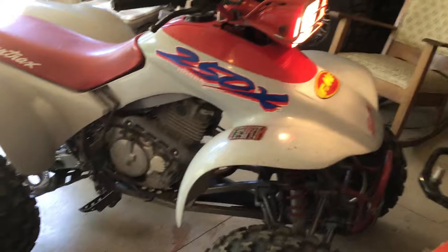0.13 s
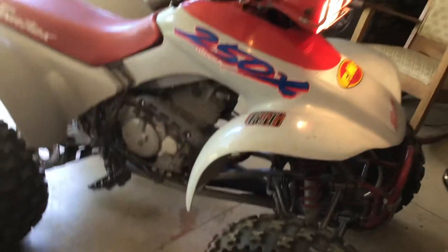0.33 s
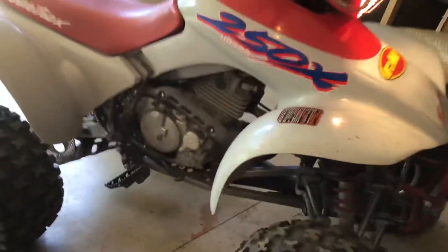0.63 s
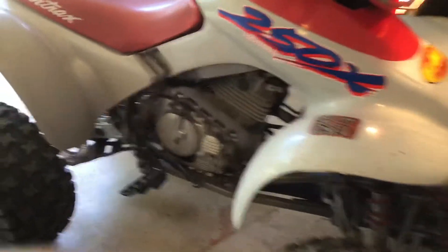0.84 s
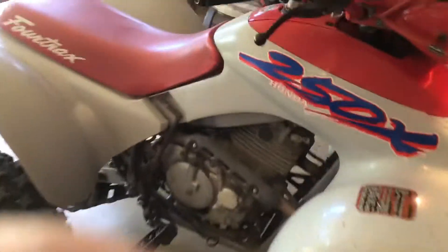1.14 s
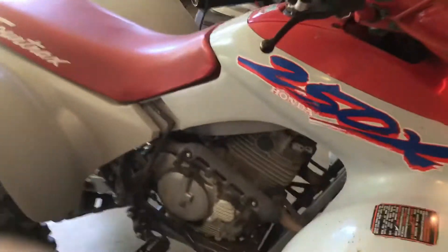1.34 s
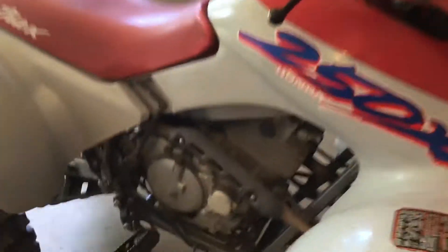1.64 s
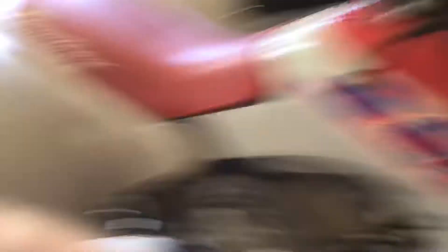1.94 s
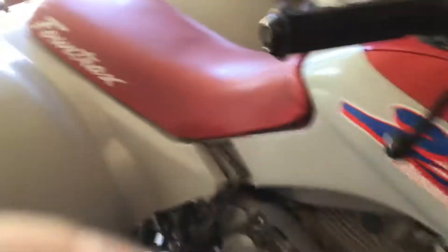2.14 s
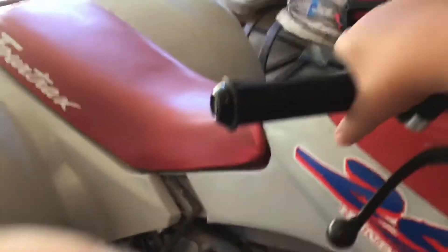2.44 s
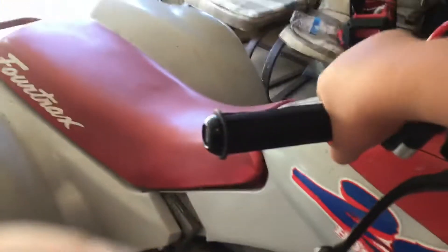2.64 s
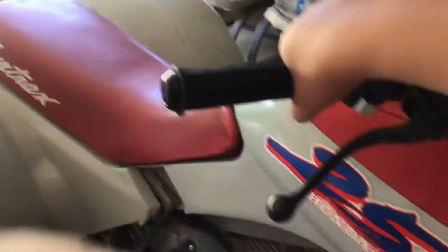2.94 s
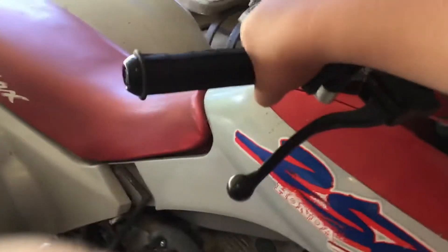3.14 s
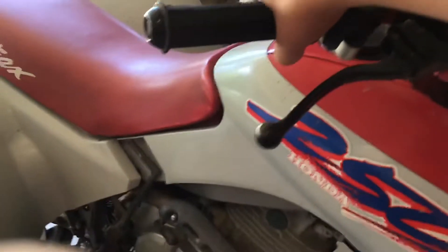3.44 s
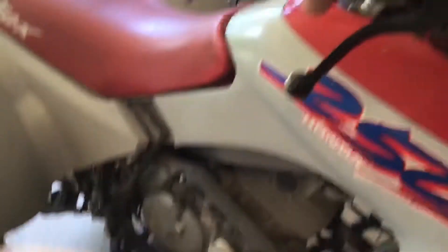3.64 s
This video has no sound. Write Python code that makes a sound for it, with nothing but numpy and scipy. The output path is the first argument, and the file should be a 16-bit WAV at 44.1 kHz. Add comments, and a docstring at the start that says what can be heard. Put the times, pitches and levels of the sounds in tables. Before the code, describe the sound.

A small single-cylinder quad engine idles steadily, chugging and clattering, close to the microphone in a hard-walled garage; near the end the throttle is blipped, it knocks, roars louder and faster, then eases slightly.

```python
"""A single-cylinder quad bike idles close by in a garage, is blipped up to a fast run, then eases off.
Exhaust: one impulse per firing rings the pipe spectrum, over a rush of gas noise. Clatter: noise taps and
random chain impulses ring the case and fins. Knocks: timed noise bursts with pitched cracks.
The throttle brings in intake roar, an airbox honk and engine-order tones. A metallic ring and a steady
boom of filtered noise lie underneath. The recorder rounds off the loudest peaks."""
import sys
import numpy as np
from scipy import signal
from scipy.fft import rfft, irfft, next_fast_len
from scipy.io import wavfile
from scipy.ndimage import map_coordinates

SR = 44100
rng = np.random.default_rng(int(sys.argv[2]) if len(sys.argv) > 2 else 0)


def transcribe(signal):
    """Save signal, clipped to [-1, 1], as a 16-bit WAV file at the path in sys.argv[1]."""
    frames = np.atleast_2d(signal).T
    limited = np.clip(frames, -1, 1)
    pcm = np.round(limited * 32767).astype(np.int16)
    wavfile.write(sys.argv[1], SR, pcm)


N = 167580

# Engine speed: (time [s], firing rate [1/s])
FIRING_RATE = [(0.0, 15.76), (0.4, 15.63), (0.9, 15.68), (1.25, 15.32), (1.7, 15.28), (2.2, 15.23),
               (2.76, 15.59), (2.83, 20.65), (2.91, 24.86), (3.0, 24.43), (3.1, 28.24), (3.18, 26.6),
               (3.27, 31.56), (3.37, 38.94), (3.45, 34.8), (3.56, 35.02), (3.68, 31.48), (3.8, 29.05)]
# Throttle: (time [s], opening [0-1])
THROTTLE_OPENING = [(2.74, 0), (2.87, 1)]
IDLE_HZ, FULL_HZ, FIRST_PHASE_CYCLES = 15.5, 38, .09

# Garage boom spectrum: (frequency [Hz], gain [dB])
DRONE_SPECTRUM = [(90, -42), (150, -20.5), (172, -2), (200, -16), (240, -5.5), (285, -6.5), (320, -0.5),
                  (360, -14), (450, -22), (800, -61.5)]
# Garage boom: (time [s], level [dB])
DRONE_LEVEL_DB = [(0, -22.5), (.9, -23), (1.6, -25.5), (2.6, -28), (3.3, -25), (3.8, -26)]
GARAGE_T60_S, GARAGE_DB, BOOM_DB = .35, -10, -17  # echo level: metal, exhaust

# Singing thin metal part: (time [s], level [dB])
SING_LEVEL_DB = [(0, -32), (.75, -34), (.9, -33), (1.05, -32), (1.21, -23), (1.32, -29.5), (1.8, -29.5),
                 (2.0, -29), (2.15, -32), (2.6, -30), (2.85, -29), (3.08, -33), (3.37, -26), (3.5, -16.5),
                 (3.6, -38), (3.8, -23)]
SING_HZ, SING_SPREAD_HZ = 2805, 28

# Engine orders: (multiple of firing rate [1], relative level [dB])
ENGINE_ORDERS = [(4, 0), (5, -7), (9, -3), (11, -7)]
# All engine orders: (time [s], level [dB])
ORDER_LEVEL_DB = [(2.8, -36), (3.05, -28), (3.17, -24), (3.28, -24), (3.42, -20), (3.6, -25), (3.75, -23)]

# Case spectrum under the clatter: (frequency [Hz], gain [dB])
CASE_SPECTRUM = [(150, -21), (450, -3), (850, -3.5), (1250, -2), (1600, -3), (2200, -1), (2700, 0.5),
                 (3300, 0), (4100, -0.5), (5100, -2.5), (5700, -8), (7100, -10), (8000, -18.5), (9500, -20),
                 (11800, -33), (13100, -28), (14000, -34), (16000, -32)]
# Modes of case and cooling fins: (frequency [Hz], level [dB], t60 [s])
FIN_MODES = [(695, -6, 0.038), (1124, -0.5, 0.078), (1299, 1, 0.098), (1557, -7.5, .07), (1868, -4, 0.16),
             (2150, -4, 0.15), (2559, 3.5, 0.14), (2806, 4.5, 0.036), (3040, 4.5, 0.11), (3340, -10, 0.05),
             (3777, 3.5, 0.023), (3974, -0.5, 0.029), (4140, 2.5, 0.095), (4850, -6, 0.083),
             (5130, -1, .05)]
FIN_DB, FIN_WAVER_DB = -5.5, 1

# Hard combustion knocks: (time [s], level [dB], crack pitch [Hz])
KNOCK_EVENTS = [(.496, -22.5, 4230), (.626, -24, 4000), (0.746, -27, 3880), (2.115, -28, 4050),
                (2.243, -21, 4260), (2.377, -22.5, 3940), (2.444, -19.5, 4020), (2.508, -23, 4130),
                (2.638, -21, 4270), (2.76, -9.5, 4400), (2.814, -11, 2350), (2.865, -13.5, 3770),
                (2.909, -12.5, 3780), (2.946, -23, 3800), (3.176, -14, 3800), (3.209, -13, 3800),
                (3.249, -12.5, 3870), (3.277, -19, 3750)]
# Knock spectrum: (frequency [Hz], gain [dB])
KNOCK_SPECTRUM = [(200, -30), (700, -10), (2000, -2), (3200, -3), (4300, 3), (5500, -6), (7200, -10),
                  (9000, -17), (12000, -25), (16000, -30)]
KNOCK_RISE_S, KNOCK_HOLD_S, KNOCK_DECAY_S = 0.0012, .007, .006
CRACK_DB, CRACK_WIDTH_HZ = -2, 400

# Taps in one engine cycle: (position after exhaust opens [cycles], level [dB])
TAP_POSITIONS = [(0.129, -8), (.58, -7.5), (.87, -2)]
TAP_DB, TAP_SCATTER_DB, TAP_JITTER_S, TAP_DECAY_S = -6.5, 1.8, 0.0026, 0.023
# Chain rattle through one cycle: (position [cycles], level [dB])
RATTLE_STROKE = [(.02, -1), (.16, -5), (.3, -4.5), (.5, -4.5), (.75, -4.5), (.9, -2.5)]
CHAIN_DB, CHAIN_SCATTER_DB, CHAIN_PER_S_AT_IDLE = -4.5, 2.5, 1600
# Clatter: (time [s], level [dB])
CLATTER_LEVEL_DB = [(0, -20), (.35, -22.5), (.75, -21), (1.3, -21), (2.1, -20.5), (2.74, -21), (2.92, -16),
                    (3.14, -21.5), (3.25, -15.5), (3.37, -16.5), (3.55, -18.5), (3.8, -17.5)]

# Intake spectrum: (frequency [Hz], gain [dB])
ROAR_SPECTRUM = [(200, -9.5), (600, -9.5), (900, -9), (1150, -4), (1550, -0.5), (2000, -12), (2700, 3.5),
                 (4200, -7), (6000, -10), (9000, -17), (13000, -23), (16000, -28)]
# Levels at FULL_HZ; growth per Hz of firing rate
ROAR_DB, ROAR_DB_PER_HZ, ROAR_DECAY_NEPER_PER_CYCLE = -15.5, 0.64, 0.29
GULP_SCATTER_DB = 1.4
HONK_HZ, HONK_WIDTH_HZ, HONK_DB, HONK_DB_PER_HZ = 1136, 92, -23, 1.3
HONK_LENGTH_CYCLES, HONK_LEAD_CYCLES = 0.36, .15  # lead over the exhaust

# Exhaust pipe at idle: (frequency [Hz], gain [dB])
PIPE_IDLE_SPECTRUM = [(30, -64), (58, -75), (74, -16.5), (90, -8), (122, -4), (147, -31.5), (172, -4),
                      (195, -9.5), (214, -12.5), (240, -22.5), (282, 5.5), (320, -5), (347, -19),
                      (398, -8.5), (450, -43), (700, -27.5), (1400, -64), (5000, -110)]
# Exhaust pipe on the throttle: (frequency [Hz], gain [dB])
PIPE_OPEN_SPECTRUM = [(30, -41.5), (70, -34), (100, -8), (122, -15), (153, -7), (200, -12), (250, -8.5),
                      (282, 6.5), (315, -1), (370, -10.5), (395, -7), (500, -22), (800, -46), (1400, -34),
                      (5000, -100)]
# Gas rush spectrum: (frequency [Hz], gain [dB])
GAS_SPECTRUM = [(20, -80), (55, -56), (110, -18), (200, 4.5), (280, 3), (380, -1.5), (480, -18), (800, -30),
                (2000, -21), (6000, -76)]
# Exhaust: (time [s], level [dB])
EXHAUST_LEVEL_DB = [(0, -26.5), (1.4, -25), (1.95, -20.5), (2.45, -20), (2.72, -20), (2.83, -15),
                    (2.95, -13.5), (3.12, -16.5), (3.3, -12.5), (3.43, -16.5), (3.6, -14.5), (3.8, -17.5)]
PUFF_SCATTER_DB, PUFF_JITTER_S = .8, .0001
GAS_DB, GAS_THROTTLE_DB, GAS_DECAY_NEPER_PER_CYCLE = -9, -1, 1.2
LAG_HZ, LAG_WIDTH_HZ = 282.4, 150  # silencer note

OVERLOAD, HARDNESS = .97, 14  # ceiling [full scale], knee sharpness
START_S, TOP_HZ = .072, 15800


def amp(db):
    """Decibels to gain."""
    return 10 ** (np.asarray(db) / 20)


def unit(x):
    """Scale to rms 1."""
    return x / np.sqrt(np.mean(x ** 2) + 1e-20)


def curve(rows):
    """One value per sample from (time [s], value) rows."""
    return np.interp(np.arange(N) / SR, *np.transpose(rows))


def wobble(knots_per_s):
    """Smooth random curve: a spline through normal random knots."""
    knots = rng.standard_normal(int(N * knots_per_s / SR) + 4)
    return map_coordinates(knots, [np.arange(N) * knots_per_s / SR])


def ring(x, response):
    """Pass x through an impulse response."""
    return signal.fftconvolve(x, response)[:N]


def resonate(x, hz, width_hz):
    """Pass x through one resonance."""
    return signal.lfilter(*signal.iirpeak(hz, hz / width_hz, SR), x)


def colour(x, points, size=16384):
    """Minimum-phase filter with the gain of (frequency [Hz], gain [dB]) points."""
    hz, db = np.transpose(points)
    log_hz = np.log(np.fft.rfftfreq(size, 1 / SR) + 1)
    gain = amp(np.interp(log_hz, np.log(hz), db))
    cepstrum = irfft(np.log(gain))
    # Folding the cepstrum makes the response causal
    cepstrum[1:size // 2] *= 2
    cepstrum[size // 2 + 1:] = 0
    return ring(x, irfft(np.exp(rfft(cepstrum))))


def strikes(times_s, sizes):
    """Impulses at the given times."""
    inside = (times_s >= 0) & (times_s < (N - 1) / SR)
    samples = np.round(times_s[inside] * SR).astype(int)
    return np.bincount(samples, sizes[inside], N)


def passes(cycles, share):
    """Times [s] at which the engine reaches a share of each cycle."""
    targets = np.arange(int(cycles[-1]) + 1) + share
    return np.interp(targets, cycles, np.arange(N) / SR, left=-1, right=-1)


def garage(x, wet_db):
    """Hard walls add a short echo: decaying noise after a 5 ms gap."""
    t = np.arange(SR // 2) / SR
    tail = rng.standard_normal(len(t)) * amp(-60 * t / GARAGE_T60_S) * (t > .005)
    return x + amp(wet_db) * ring(x, tail / np.linalg.norm(tail))


def metal(blows, spectrum):
    """Blows sound through the case and ring decaying sine modes of the fins."""
    t = np.arange(SR // 4) / SR
    fins = np.zeros(len(t))
    for hz, db, t60_s in FIN_MODES:
        decay = amp(db - 60 * t / t60_s) / np.sqrt(t60_s)
        fins += decay * np.sin(2 * np.pi * (hz * t + rng.random()))
    case = garage(unit(colour(blows, spectrum)), GARAGE_DB)
    fin_gain = amp(FIN_DB + FIN_WAVER_DB * wobble(5.6))
    return unit(case + fin_gain * unit(ring(blows, fins)))


def drone():
    """Garage boom fills the gaps between puffs: filtered noise."""
    return unit(colour(rng.standard_normal(N), DRONE_SPECTRUM)) * amp(curve(DRONE_LEVEL_DB))


def sing(cycles):
    """Thin metal sings: a sine of wavering pitch, pumped once per firing."""
    phase = np.cumsum(SING_HZ + SING_SPREAD_HZ * wobble(90)) / SR
    pump_db = 4.8 * np.cos(2 * np.pi * (cycles - .1)) + 1.3 * wobble(45)
    return unit(np.sin(2 * np.pi * phase) * amp(pump_db)) * amp(curve(SING_LEVEL_DB))


def growl(cycles):
    """On the throttle, sines at multiples of the firing rate glide with the speed."""
    tones = np.zeros(N)
    for order, db in ENGINE_ORDERS:
        tones += amp(db + 1.9 * wobble(4.97)) * np.sin(2 * np.pi * order * cycles)
    return tones * curve(THROTTLE_OPENING) * amp(curve(ORDER_LEVEL_DB))


def knocks():
    """Hard combustion: short noise bursts in the metal, each with a crack at its own pitch."""
    bursts, cracks = np.zeros(N), np.zeros(N)
    for start_s, db, hz in KNOCK_EVENTS:
        t = np.maximum(np.arange(N) / SR - start_s, 0)
        rise = 1 - np.exp(-t / KNOCK_RISE_S)
        fall = np.exp(-np.clip(t - KNOCK_HOLD_S, 0, .5) / KNOCK_DECAY_S)
        shape = amp(db) * rise * fall
        burst_noise, crack_noise = rng.standard_normal((2, N))
        bursts += shape * burst_noise
        cracks += shape * unit(resonate(crack_noise, hz, CRACK_WIDTH_HZ))
    body = metal(bursts, KNOCK_SPECTRUM) * np.std(bursts)
    return body + amp(CRACK_DB) * garage(cracks, GARAGE_DB)


def valve_taps(rate_hz, cycles):
    """Valves and piston tap in step with the crank: decaying noise at set points of the cycle."""
    hits = np.zeros(N)
    for share, db in TAP_POSITIONS:
        times_s = passes(cycles, share)
        jitter, scatter = rng.standard_normal((len(times_s), 2)).T
        hits += strikes(times_s + TAP_JITTER_S * jitter, amp(db + TAP_SCATTER_DB * scatter))
    decay = np.exp(-np.arange(SR // 10) / SR / TAP_DECAY_S)
    return ring(hits / np.sqrt(rate_hz), decay) * rng.standard_normal(N)


def chain(rate_hz, cycles):
    """Chain rattles: random impulses, denser with speed, louder and softer through the cycle."""
    chance = CHAIN_PER_S_AT_IDLE * rate_hz / IDLE_HZ / SR
    links = (rng.random(N) < chance) * rng.choice([-1, 1], N) / np.sqrt(rate_hz)
    stroke_db = np.interp(cycles, *np.transpose(RATTLE_STROKE), period=1)
    return links * amp(CHAIN_SCATTER_DB * rng.standard_normal(N) + stroke_db)


def clatter(rate_hz, cycles):
    """Taps and chain together strike the ribbed metal."""
    taps = amp(TAP_DB) * unit(valve_taps(rate_hz, cycles))
    links = amp(CHAIN_DB) * unit(chain(rate_hz, cycles))
    return metal(taps + links, CASE_SPECTRUM) * amp(curve(CLATTER_LEVEL_DB))


def roar(rate_hz, cycles):
    """Open intake roars and airbox honks: noise pulsed once per cycle, louder with speed."""
    fade = np.exp(-ROAR_DECAY_NEPER_PER_CYCLE * (cycles % 1))
    gulps = rng.standard_normal(N) * fade * amp(GULP_SCATTER_DB * wobble(110))
    gulps = metal(gulps, ROAR_SPECTRUM)
    gate = 1 / (1 + np.exp(((cycles + HONK_LEAD_CYCLES) % 1 - HONK_LENGTH_CYCLES) * 20))
    honk = resonate(rng.standard_normal(N) * gate, HONK_HZ, HONK_WIDTH_HZ)
    honk = unit(resonate(honk, HONK_HZ, 2 * HONK_WIDTH_HZ))
    over_hz = rate_hz - FULL_HZ
    gulps = gulps * amp(ROAR_DB + ROAR_DB_PER_HZ * over_hz)
    honk = honk * amp(HONK_DB + HONK_DB_PER_HZ * over_hz)
    return curve(THROTTLE_OPENING) * (gulps + honk)


def exhaust(rate_hz, cycles):
    """One puff per firing rings the pipe, drawn out at idle, short on the throttle; gas rushes after."""
    times_s = passes(cycles, 0)
    jitter, scatter = rng.standard_normal((len(times_s), 2)).T
    puffs = strikes(times_s + PUFF_JITTER_S * jitter, amp(PUFF_SCATTER_DB * scatter))
    puffs = puffs / np.sqrt(rate_hz)
    opening = np.clip(curve(THROTTLE_OPENING), 0, 1)
    # All-pass: the silencer holds back its own note
    lazy = puffs - 2 * resonate(puffs, LAG_HZ, LAG_WIDTH_HZ)
    idle_pipe = np.sqrt(1 - opening) * unit(colour(lazy, PIPE_IDLE_SPECTRUM))
    open_pipe = np.sqrt(opening) * unit(colour(puffs, PIPE_OPEN_SPECTRUM))
    fade = np.exp(-GAS_DECAY_NEPER_PER_CYCLE * (cycles % 1))
    rush = unit(colour(rng.standard_normal(N) * fade, GAS_SPECTRUM))
    rush = amp(GAS_DB + GAS_THROTTLE_DB * opening) * rush
    return garage(idle_pipe + open_pipe + rush, BOOM_DB) * amp(curve(EXHAUST_LEVEL_DB))


def scene():
    """Sum of all layers; the firing rate times those tied to the engine cycle."""
    rate_hz = curve(FIRING_RATE)
    cycles = FIRST_PHASE_CYCLES + np.cumsum(rate_hz) / SR
    background = drone() + sing(cycles) + growl(cycles)
    engine = knocks() + clatter(rate_hz, cycles) + roar(rate_hz, cycles) + exhaust(rate_hz, cycles)
    return (background + engine)[None]


def record(dry):
    """The recorder opens after a moment, rounds off the peaks and cuts the top."""
    x = dry * (np.arange(N) / SR > START_S)
    x = x / (1 + np.abs(x / OVERLOAD) ** HARDNESS) ** (1 / HARDNESS)
    size = next_fast_len(N + SR // 2)
    passband = np.fft.rfftfreq(size, 1 / SR) < TOP_HZ
    return irfft(rfft(x, size) * passband, size)[:, :N]


dry = scene()
out = record(dry)
transcribe(out)
```